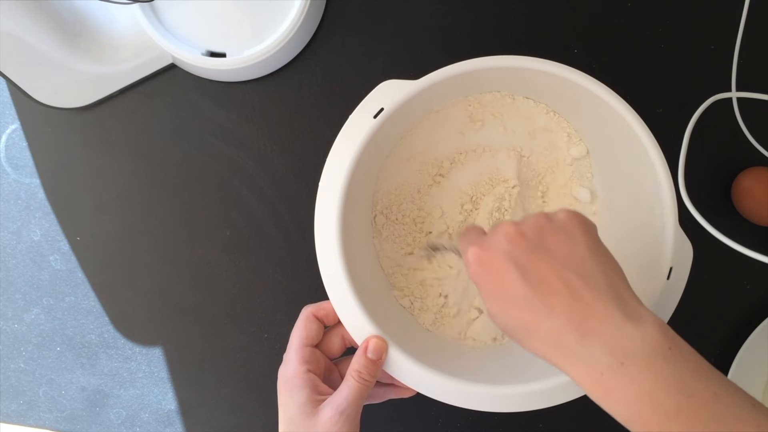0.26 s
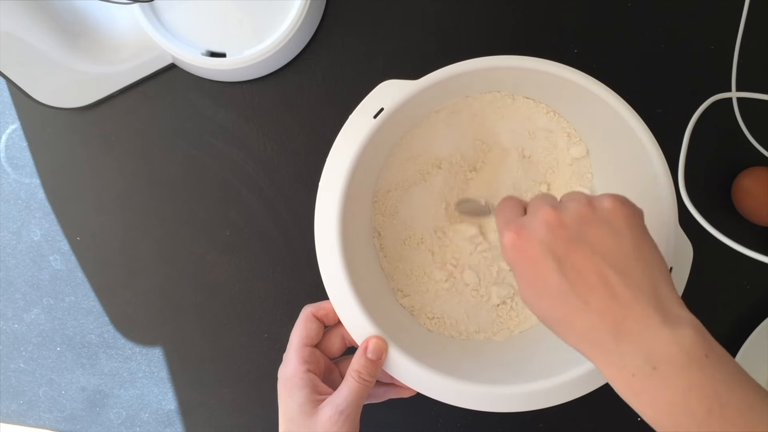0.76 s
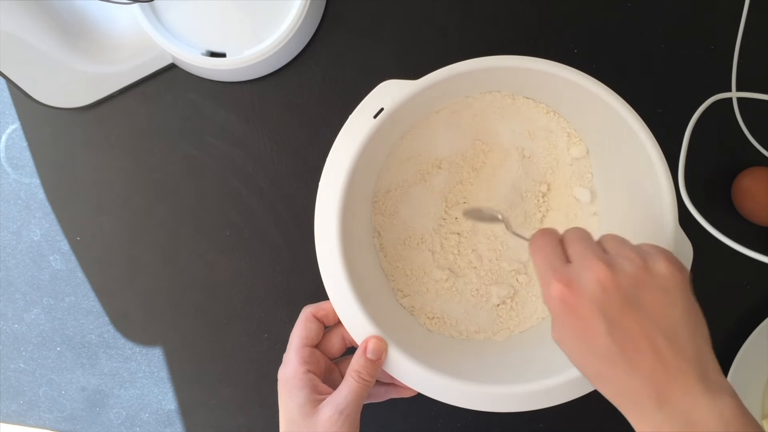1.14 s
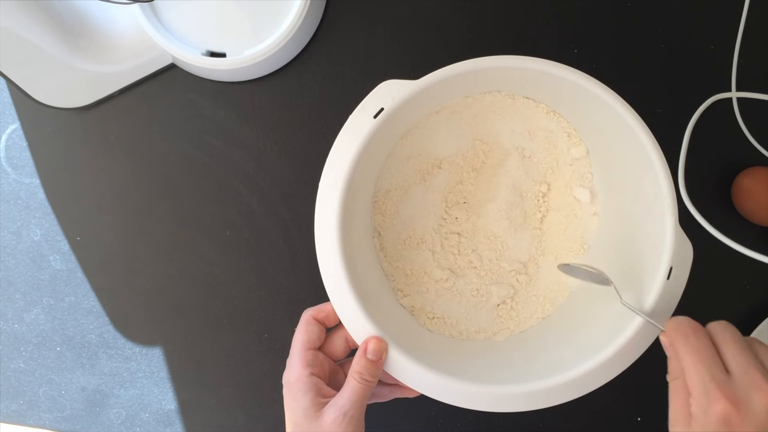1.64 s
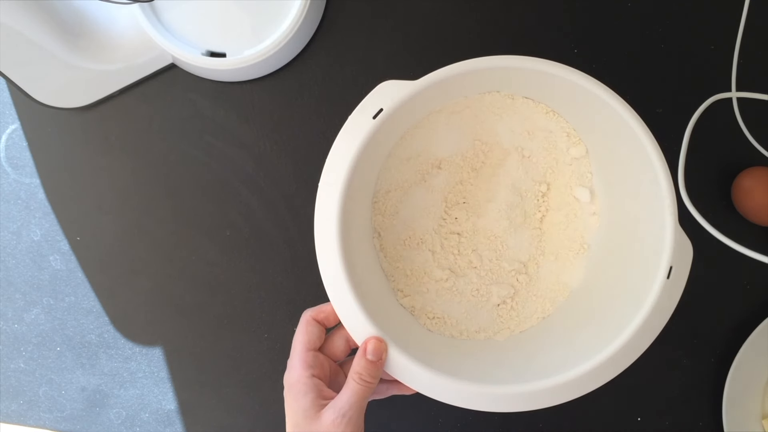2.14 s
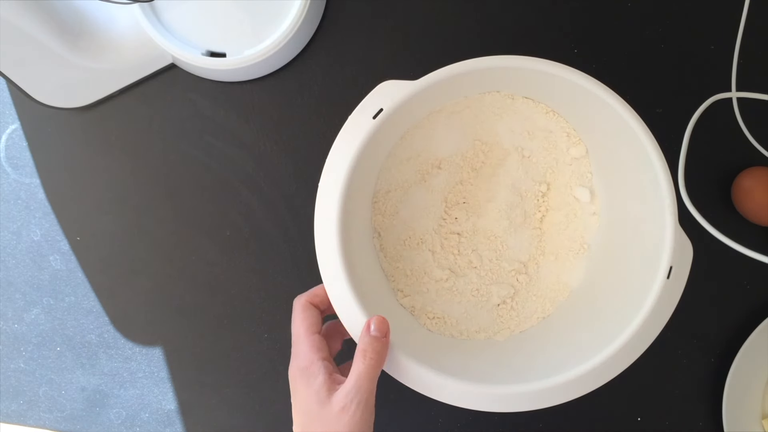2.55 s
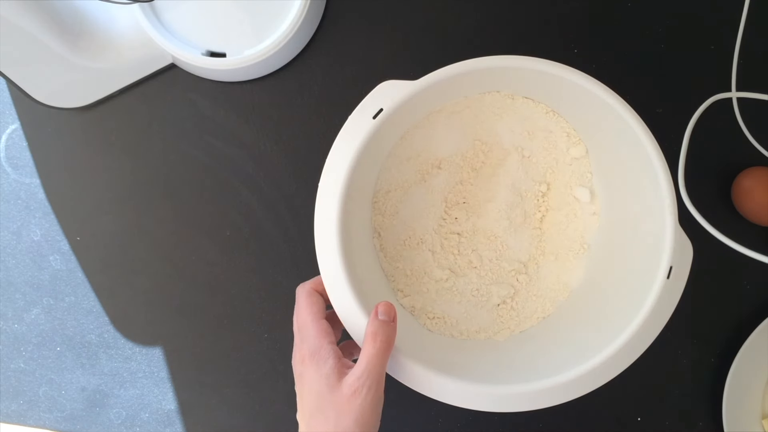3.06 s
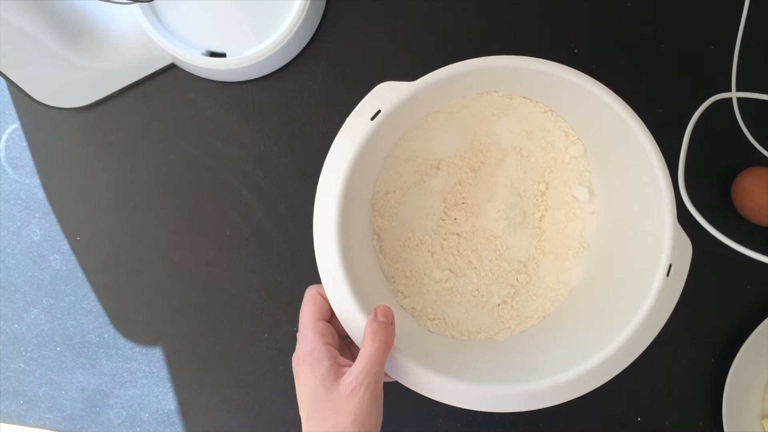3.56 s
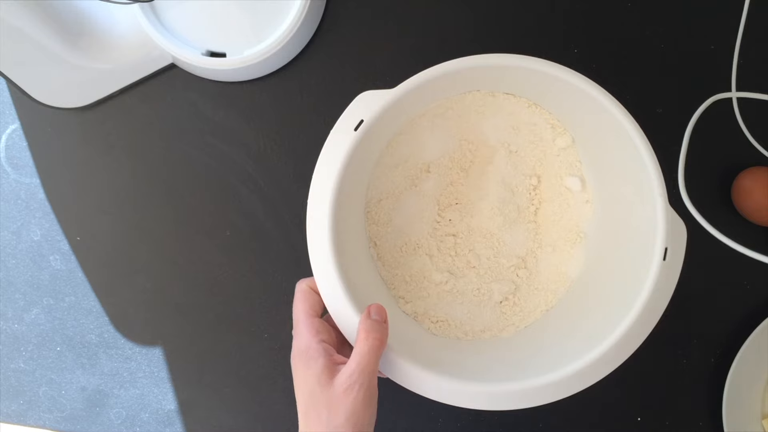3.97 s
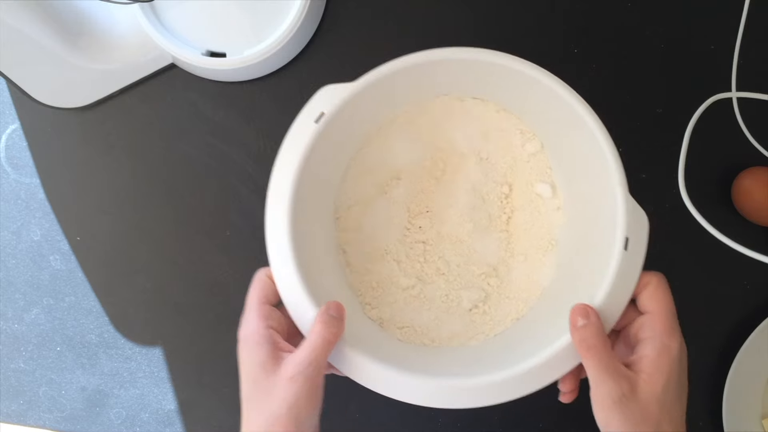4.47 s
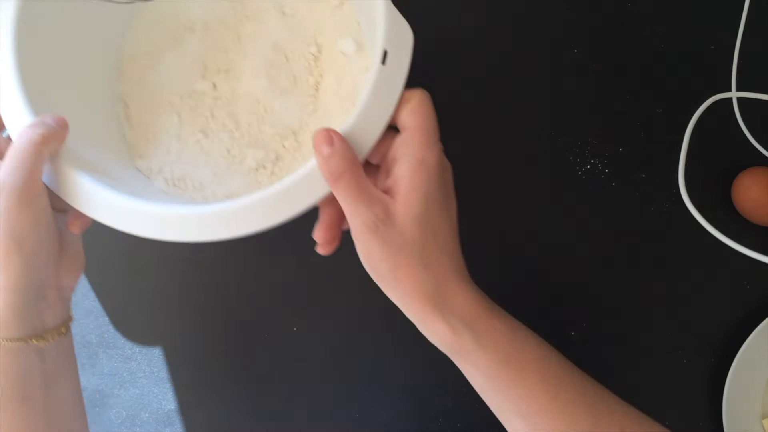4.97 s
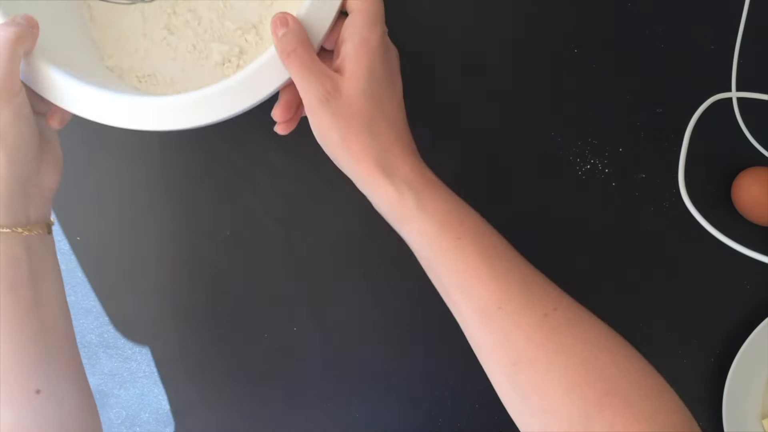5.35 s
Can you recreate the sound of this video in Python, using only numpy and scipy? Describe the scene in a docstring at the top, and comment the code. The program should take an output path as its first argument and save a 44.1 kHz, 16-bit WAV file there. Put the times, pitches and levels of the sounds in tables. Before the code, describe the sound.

During the first second, a small metal spoon stirs dry flour in a plastic bowl with a few very faint, gritty strokes, a soft bump at 0.2 seconds and a clearer tap at 0.6. At about 1.7 and 1.8 seconds the spoon knocks twice on the rim, loud and sharp. It is then laid on a plate, giving two bright, ringing clinks at 2.7 and 2.9 seconds and a softer one at 3.4. The bowl slides on the worktop, faintly around 3.7 seconds, then with a low, stuttering judder from 4.2 to 4.5. Light clicks come near 4.9 seconds as it is lifted, and at 5.4 it is set down with a loud, hollow knock. Everything sounds close, in a small, hard-walled kitchen that adds a short echo to each hit, over a very faint low household rumble.

```python
"""A spoon stirs flour in a plastic bowl on a kitchen worktop and is knocked clean on the rim: friction
makes the rustle, and each impact excites the damped modes of worktop, wall and rim. The spoon is then
laid on a plate, which rings at three touches. Hands slide the bowl in stick-slip jolts, lift it and set
it down. Throughout, a small hard room reverberates after each blow, over a low household rumble."""
import sys
import numpy as np
from scipy import signal
from scipy.fft import rfft, irfft
from scipy.io import wavfile
from scipy.ndimage import uniform_filter1d

SR = 44100
rng = np.random.default_rng(int(sys.argv[2]) if len(sys.argv) > 2 else 0)


def pcm_store(signal):
    """Save signal as 16-bit PCM."""
    levels = np.round(np.clip(np.atleast_2d(signal), -1, 1) * 32767)
    wavfile.write(sys.argv[1], SR, levels.astype(np.int16).T)


N = 247842


def undb(db):
    """Amplitude ratio of a level in dB."""
    return 10 ** (np.asarray(db) / 20)


def unit(x):
    """Normalisation to rms 1."""
    return x / np.sqrt(np.mean(x ** 2))


def band(x, hz, width):
    """Two-pole resonance with gain 1 at the centre."""
    return signal.lfilter(*signal.iirpeak(hz, hz / width, fs=SR), x)


def walk(rate):
    """Random modulation: a new value every 1 / rate s, joined by ramps; spread near 1."""
    hold = int(SR / rate)
    return uniform_filter1d(np.repeat(rng.standard_normal(N // hold + 1), hold), hold)[:N]


def add(out, start, x):
    """Superposition of a sound from its start in seconds."""
    i = int(start * SR)
    out[i:i + len(x)] += x[:N - i]


def stroke(start, attack, length, release):
    """Envelope of a movement: it swells, holds until length s, then decays 20 dB per release time."""
    t = np.arange(N) / SR - start
    return np.clip(t / attack, 0, 1) ** 2 * undb(-20 * np.maximum(t - length, 0) / release)


def friction():
    """Friction noise at rms 1: stick-slip shakes worktop and wall; grains rustle, scrape and hiss."""
    # Bands that colour the scrape as heard, strongest near 2.6 kHz.
    # Each row: centre in Hz, width in Hz, relative level in dB.
    scrape_bands = [(1944, 560, -7.5), (2600, 720, 3.5), (3957, 1400, -12.5)]
    jolts = rng.standard_normal(N) * undb(1.5 * walk(35))
    judder = sum(undb(db) * band(band(jolts, hz, 83), hz, 83)
                 for hz, db in ((135, -1), (185, 5.0), (300, -3.5), (450, -29.5)))
    grains = rng.standard_normal((3, N)) * undb(1.5 * rng.exponential(size=(3, N)) + 2.5 * walk(90))
    rustle = band(band(grains[0], 600, 1100), 600, 1100)
    scrape = sum(undb(db) * band(grains[1], hz, width) for hz, width, db in scrape_bands)
    grit = band(grains[2], 15000, 13000)
    return unit(judder), unit(rustle), unit(scrape), unit(grit)


def stirring(judder, rustle, scrape, grit):
    """Granular friction: the flour sounds with each stroke of the spoon."""
    # Each row: start in seconds, length in seconds, scrape level in dB, grit in dB relative to that.
    strokes = [(0.0, 0.12, -64, -10), (0.186, 0.05, -66.5, 4.5), (0.467, 0.053, -81, 3.5),
               (0.87, .04, -79.5, 2)]
    flour = scrape + undb(-1) * rustle + undb(-2) * judder
    return sum(stroke(start, 0.004, length, release=0.037) * undb(db) * (flour + undb(grit_db) * grit)
               for start, length, db, grit_db in strokes)


def ring(hz, t60, db, rise):
    """Damped modes swell over the contact time, rise s; neighbours start in opposite phase."""
    t = np.arange(int(1.2 * np.max(t60) * SR)) / SR
    hz, t60, db = (np.reshape(v, (-1, 1)) for v in (hz, t60, db))
    modes = undb(db - 60 * t / t60) * np.sin(2 * np.pi * hz * t)
    return (modes[::2].sum(axis=0) - modes[1::2].sum(axis=0)) * (1 - np.exp(-t / rise))


def crack(db, length, low_hz, top_hz, order):
    """Contact noise of hard surfaces, falling 30 dB in length s; softer contact is duller."""
    t = np.arange(SR // 8) / SR
    hiss = signal.lfilter(*signal.butter(2, low_hz, "high", fs=SR), rng.standard_normal(len(t)))
    return undb(db - 30 * t / length) * signal.lfilter(*signal.butter(order, top_hz, fs=SR), hiss)


def bowl_blows():
    """Modal excitation: the height of a blow divides its force between worktop, wall and rim."""
    # Each row: start in seconds, force in dB, height (0 foot, 1 rim), crack in dB relative to the force,
    # crack cutoff in Hz, share of the rim's free ring time that hand and flour leave.
    blows = [(0.2231, -45.5, 0.12, -21, 3000, 0.07), (0.5629, -30.5, 0.49, -17, 5860, 0.27),
             (.5945, -54, 0.73, 6, 1500, 0.7), (0.624, -70.5, 1, 16, 8900, 0.23),
             (0.884, -72, 0.29, 5, 9000, 1), (1.6358, -74, 0.97, -6, 3000, 0.4),
             (1.647, -58, 0.5, -11, 3000, 1), (1.6578, -23, 0.91, -7.5, 3900, 0.46),
             (1.826, -20.5, 0.86, -4, 3770, 0.44), (2.51, -84, 1, 8, 4000, 0.85),
             (3.735, -61.5, 0.27, -23, 3000, 0.2), (4.517, -48, 0.31, -5.5, 4000, 0.28),
             (4.8494, -45, 0.88, 13, 9000, 0.63), (4.861, -40.5, 0.18, 4.5, 8700, 0.35),
             (4.906, -58.5, 0.89, 8, 14050, 0.8), (5.3022, -60, 0.96, 14, 2530, 0.68),
             (5.3818, -15.5, 0.47, -3, 1480, 0.18), (5.394, -29, 0.37, 9, 800, 0.46),
             (5.529, -63, 0.93, 7.5, 4100, 0.75)]
    # Modes of the three parts. Each row: frequency in Hz, T60 in seconds, relative level in dB.
    worktop_modes = [(60.5, 0.32, -5), (98, .15, -1.5), (133, 0.12, 3.5)]
    wall_modes = [(183.4, 0.23, -2.5), (304.7, 0.24, 0), (422, 0.066, 4), (482, 0.076, 5), (528, .07, 7.5),
                  (596.4, 0.061, 6.5), (764, 0.056, -2), (950, 0.035, -2)]
    rim_modes = [(1060, 0.038, -6.5), (1580, 0.018, -15), (1788, 0.049, 2.5), (2150, 0.049, 0),
                 (2258, 0.063, 0), (2507, 0.066, 1.5), (2704, 0.06, -1.5), (3056, 0.038, -3.5),
                 (3358, 0.039, -7), (3800, 0.022, -3), (4502, 0.011, 0), (5340, 0.0061, -11.5),
                 (5800, 0.013, -10)]
    spoon_laid_s = 2.7
    wall_octaves = np.log2(np.array(wall_modes)[:, 0] / 450)
    out = np.zeros(N)
    for start, force_db, height, crack_db, top_hz, free in blows:
        worktop_db, rim_db = 2.5 - 23 * height, -32 + 42 * height
        wall_db = 0.8 * height * wall_octaves  # higher blows are brighter
        wall_free = free ** 0.6  # the wide wall is damped less than the rim
        for modes, part_db, rise, ring_share in ((worktop_modes, worktop_db, 0.003, wall_free),
                                                 (wall_modes, wall_db, 0.0015, wall_free),
                                                 (rim_modes, rim_db, 0.0009, free)):
            hz, t60, mode_db = np.transpose(modes)
            # No two blows land alike.
            detune, scatter_db = rng.standard_normal((2, len(hz))) * [[0.008], [1.2]]
            db = force_db + part_db + mode_db + scatter_db
            add(out, start, ring(hz * (1 + detune), ring_share * t60, db, rise))
        add(out, start, crack(force_db + crack_db, length=0.026, low_hz=420, top_hz=top_hz, order=1))
        if start < spoon_laid_s:  # the spoon in the hand rings too
            add(out, start, ring(hz=9150, t60=0.1, db=force_db + rim_db - 39, rise=0.0009))
    return out


def faint_rings():
    """Free decay of single modes, heard as faint lone tones."""
    # Each row: start in seconds, frequency in Hz, T60 in seconds, level in dB.
    lone_modes = [(.466, 9100, 0.11, -66), (.6, 570.8, 0.41, -51.5), (0.789, 1244, 0.5, -69),
                  (4.857, 2458, 0.43, -53.5), (4.929, 289.4, 1.5, -62.5), (2.722, 186.4, 0.13, -43),
                  (2.862, 181.4, 0.11, -41.5)]
    out = np.zeros(N)
    for start, hz, t60, db in lone_modes:
        add(out, start, ring(hz, t60, db, rise=0.013))
    return out


def plate_clinks():
    """The point of impact weights the modes: each touch of the spoon lands elsewhere on the plate."""
    # Frequencies of each clink in Hz: the lowest are worktop and bowl ringing along, the rest the plate.
    mode_hz = [296, 351, 627, 880, 1302, 1641, 2431, 2750, 3338, 4285, 4348, 4428, 4818, 5489, 5613, 5912,
               6451, 6747, 7302, 7670, 8076, 8145, 8520, 9204, 9715, 9925, 10845, 11378, 11975, 12598,
               12765, 13220, 14195, 14600, 15230]
    # Each row: T60 of that mode in seconds, its level in dB at the first, second and third touch.
    modes = [(0.14, -46.5, -36, -44.5), (0.05, -26.5, -35.5, -42), (0.026, -28.5, -42, -42),
             (.25, -60, -57.5, -52), (0.15, -62.5, -45, -93), (0.48, -46.5, -50, -68),
             (0.28, -25.5, -37, -46.5), (0.017, -26.5, -26.5, -36), (0.13, -20.5, -25, -38.5),
             (0.42, -40, -41.5, -53), (0.062, -16.5, -30.5, -32.5), (0.035, -42, -32, -26),
             (0.1, -24.5, -29.5, -39), (0.28, -35.5, -45, -59), (0.15, -44.5, -26, -58),
             (0.11, -21.5, -40, -44.5), (0.086, -21, -27, -40), (0.22, -41.5, -40, -45.5),
             (0.2, -70.5, -45, -69), (0.2, -53, -63, -75), (0.073, -19, -42, -60),
             (0.15, -30, -34.5, -40.5), (0.14, -59, -60, -54), (0.17, -63, -32, -59),
             (0.12, -46, -69, -39.5), (0.084, -21.5, -41, -65), (0.13, -41, -33, -48),
             (0.19, -82, -56, -52), (0.091, -36, -35, -38.5), (0.14, -57.5, -44, -57),
             (0.15, -59, -54, -70), (0.1, -50.5, -75, -54), (0.095, -51, -39.5, -43),
             (0.08, -58.5, -56, -64), (0.07, -96, -39, -42)]
    # Each row: start in seconds, crack level in dB, crack length in seconds, crack cutoff in Hz.
    touches = [(2.7181, -17, 0.059, 6080), (2.8564, -22, 0.068, 6030), (3.3563, -31.5, 0.069, 6040)]
    t60, *touch_levels = np.transpose(modes)
    out = np.zeros(N)
    for (start, crack_db, length, top_hz), mode_db in zip(touches, touch_levels):
        add(out, start, ring(mode_hz, t60, mode_db, rise=0.00017))
        add(out, start, crack(crack_db, length, low_hz=1700, top_hz=top_hz, order=2))
    return out


def sliding(judder, rustle, scrape, grit):
    """Stick-slip friction: the bowl drags over the worktop, and its foot catches and lurches."""
    # One list per slide. Each row: time in seconds, scrape level in dB.
    slides = [
        [(3.58, -79), (3.65, -70), (3.66, -74.5), (3.698, -71.5), (3.712, -71), (3.732, -70), (3.85, -90)],
        [(3.98, -101), (4.008, -81.5), (4.128, -83), (4.212, -66.5), (4.448, -71.5), (4.514, -64.5),
         (4.68, -88)],
    ]
    # Each row: start in seconds, judder level in dB.
    lurches = [(3.611, -57.5), (3.675, -61), (3.72, -55), (4.197, -39), (4.232, -47.5), (4.281, -47),
               (4.341, -46.5), (4.379, -53.5), (4.462, -45.5), (4.499, -53)]
    t = np.arange(N) / SR
    drag = sum(undb(np.interp(t, times, db, -120, -120)) for times, db in map(np.transpose, slides))
    lurch = sum(undb(db) * stroke(start, attack=0.016, length=0.0235, release=0.043)
                for start, db in lurches)
    shake = undb(7.5) * drag + lurch
    return shake * judder + drag * (scrape + undb(-11.5) * rustle + undb(-13) * grit)


def room(x):
    """Reverberation: dense echoes build up in a few ms and die soonest in the high treble."""
    # Each row: frequency in Hz, T60 in seconds, relative level in dB.
    decay = [(58, 0.87, 5.5), (202, 0.16, -3), (554.4, 0.42, 5), (2030, 0.66, -1.35), (5000, 0.54, -6),
             (11700, 0.073, 7)]
    hz, *columns = np.transpose(decay)
    t, tail = np.arange(int(0.7 * SR)) / SR, 0
    for centre in 60 * 2 ** np.arange(0, 8.1, 0.5):  # half-octave bands
        t60, db = (np.interp(np.log(centre), np.log(hz), column) for column in columns)
        tail += band(rng.standard_normal(len(t)), centre, centre / 2) * undb(db - 60 * t / t60)
    tail *= 1 - np.exp(-t / 0.0017)
    return signal.fftconvolve(x, tail / np.sqrt(np.sum(tail ** 2)))[:N]


def hush():
    """Noise floor: a low household rumble wavers over the steady hiss of the microphone."""
    # Each row: frequency in Hz, relative spectral density in dB.
    spectrum = [(15, -79), (25, -36.5), (64, -7), (129, -4.5), (221, -21), (349, -23.5), (509, -24),
                (552, -21.5), (848, -30.5), (997, -27.5), (1900, -35), (2120, -33.5), (15500, -43)]
    hz, db = np.transpose(spectrum)
    bin_hz = np.arange(N // 2 + 1) * SR / N + 1
    gain = undb(np.interp(np.log(bin_hz), np.log(hz), db))
    noise = unit(irfft(rfft(rng.standard_normal(N)) * gain, N))
    rumble = signal.sosfilt(signal.butter(2, 300, fs=SR, output="sos"), noise)
    waver = undb(1.7 * walk(2.4)) - 1
    return undb(-68) * (noise + rumble * waver)


def scene():
    """Superposition of direct sound, reverberation and noise floor."""
    textures = friction()
    direct = stirring(*textures) + bowl_blows() + faint_rings() + plate_clinks() + sliding(*textures)
    return (direct + undb(-11) * room(direct) + hush())[None]


def record(dry):
    """Band limiting: the microphone drops the deepest bass and cuts the top."""
    low_hz, top_hz = 40, 15450
    thin = signal.lfilter(*signal.butter(1, low_hz, "high", fs=SR), dry)
    return signal.sosfilt(signal.ellip(8, 0.2, 60, top_hz, fs=SR, output="sos"), thin)


dry = scene()
out = record(dry)
pcm_store(out)
```